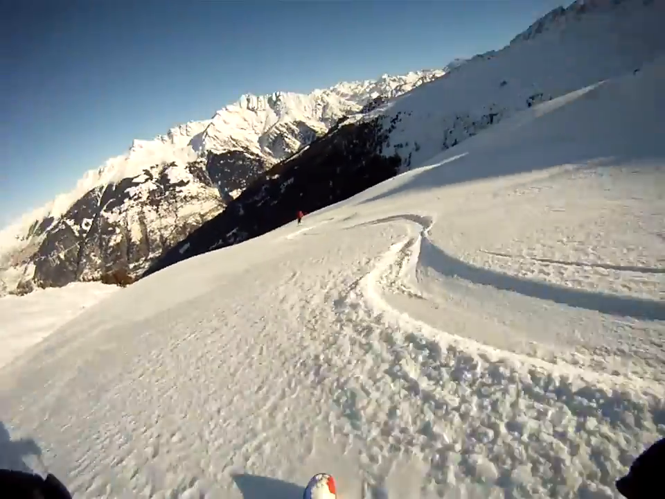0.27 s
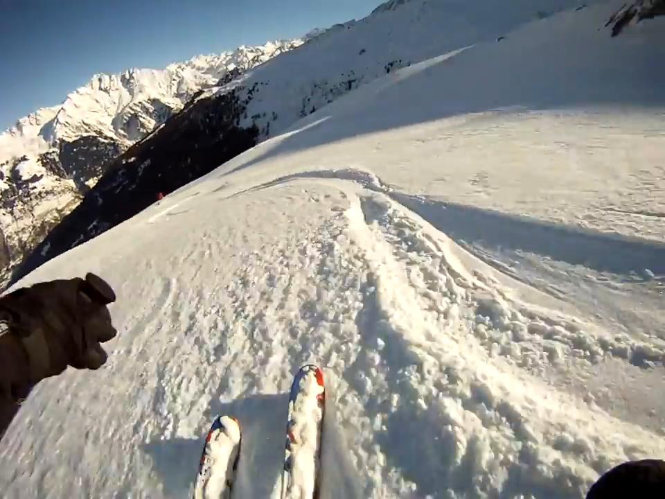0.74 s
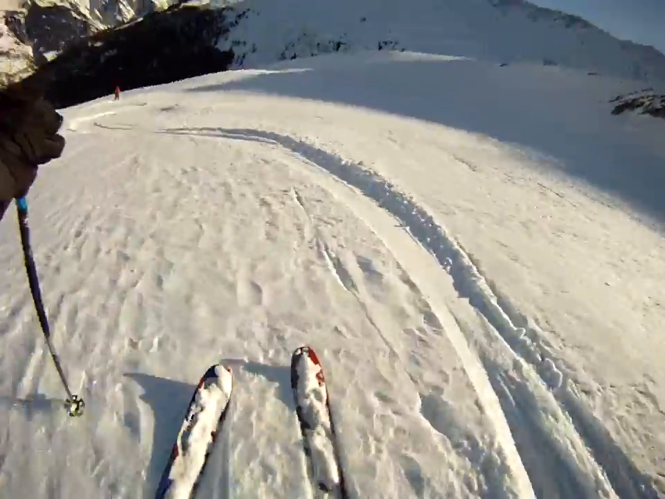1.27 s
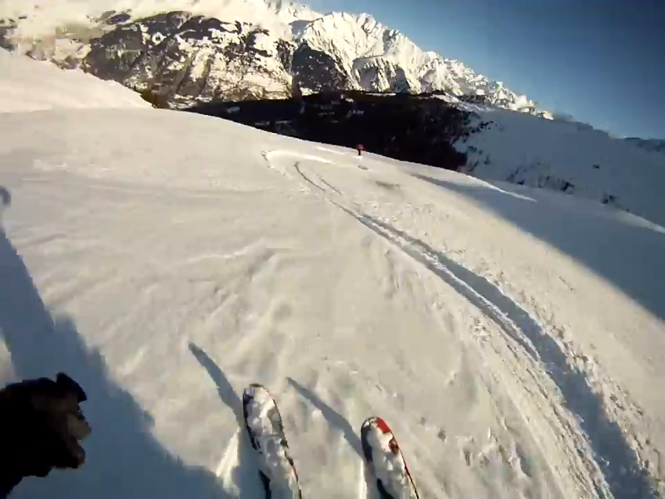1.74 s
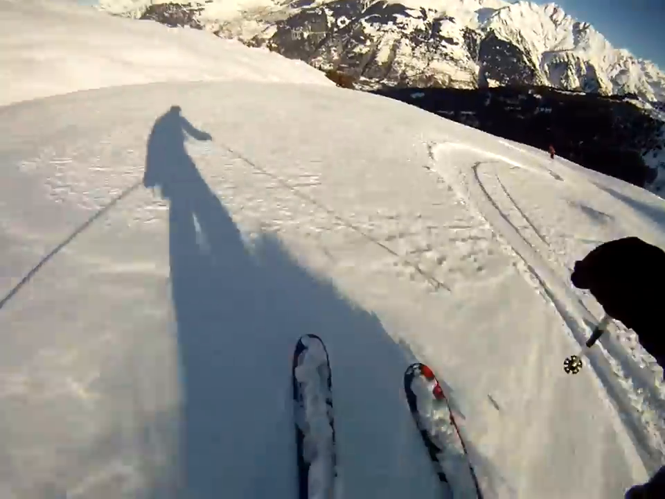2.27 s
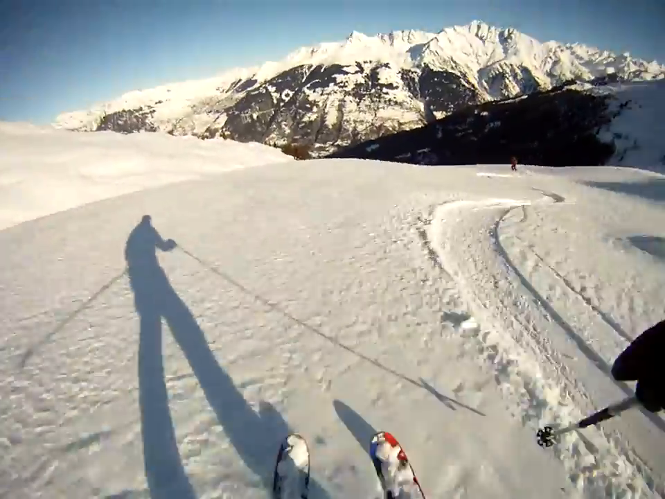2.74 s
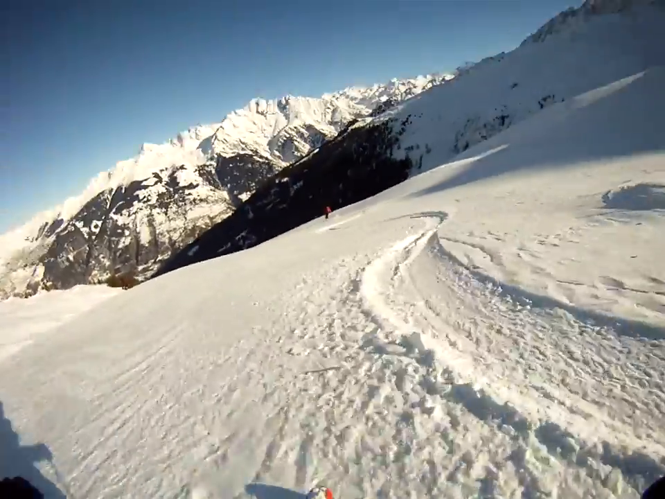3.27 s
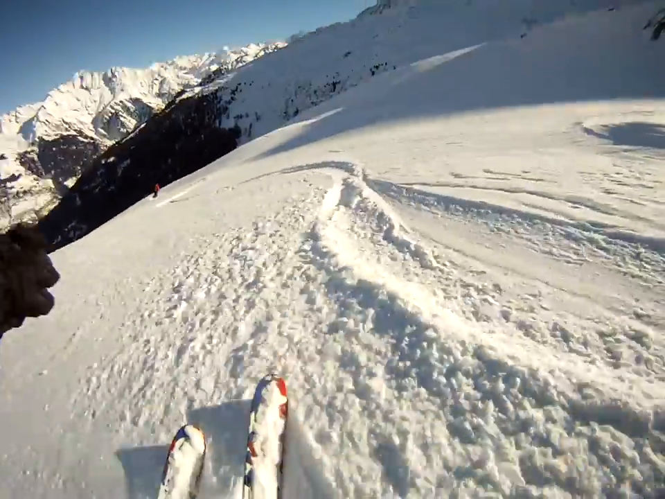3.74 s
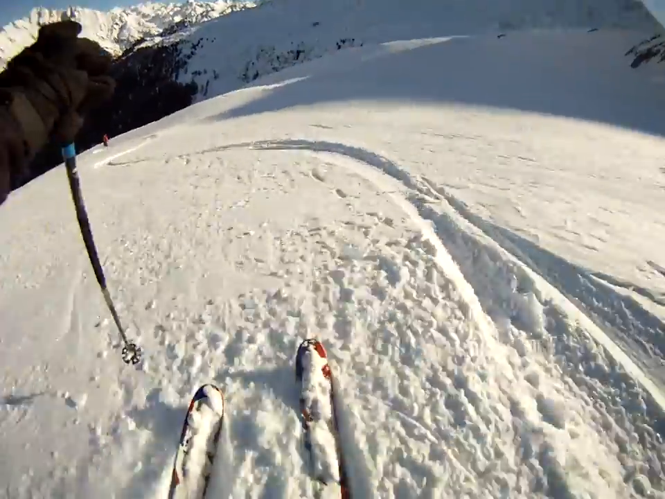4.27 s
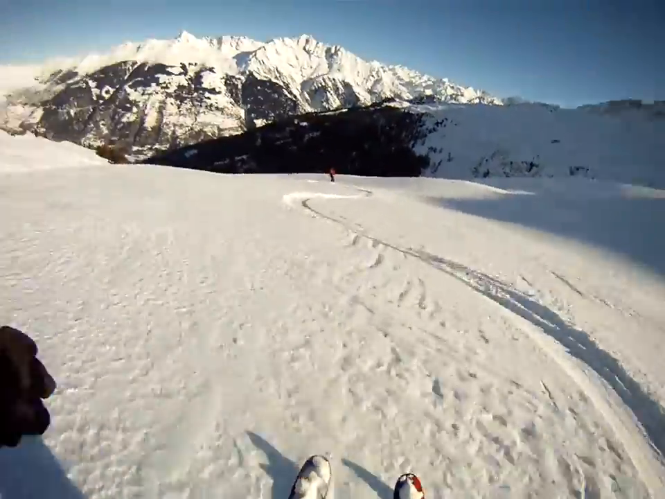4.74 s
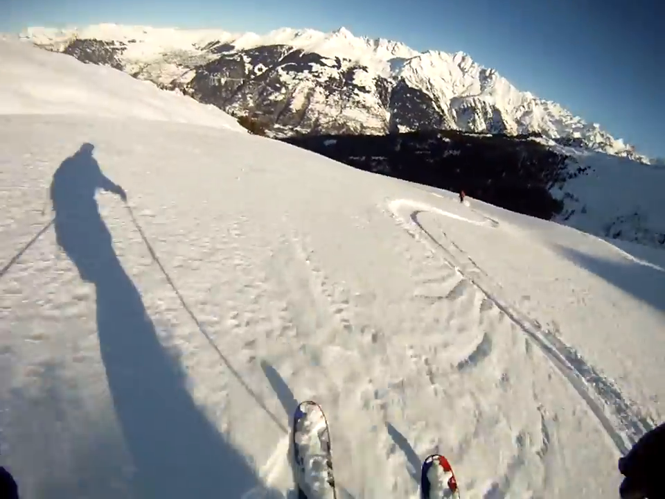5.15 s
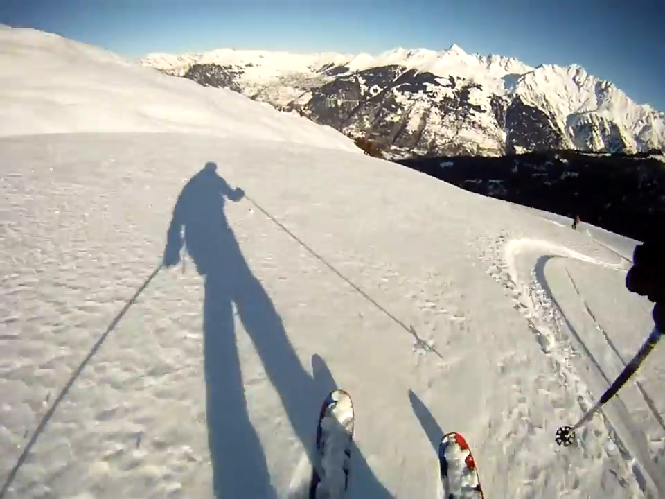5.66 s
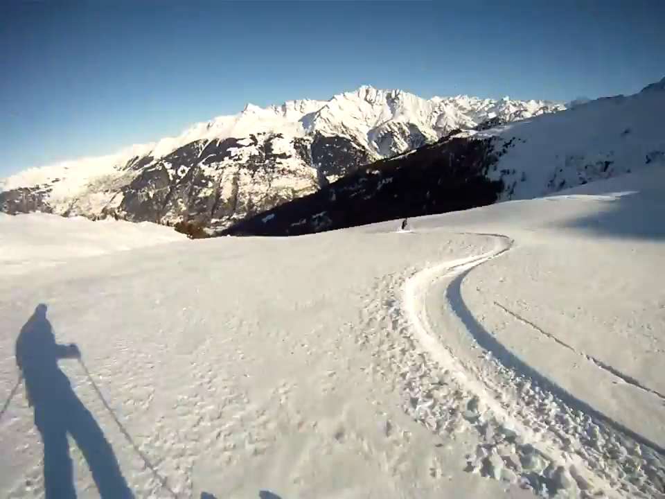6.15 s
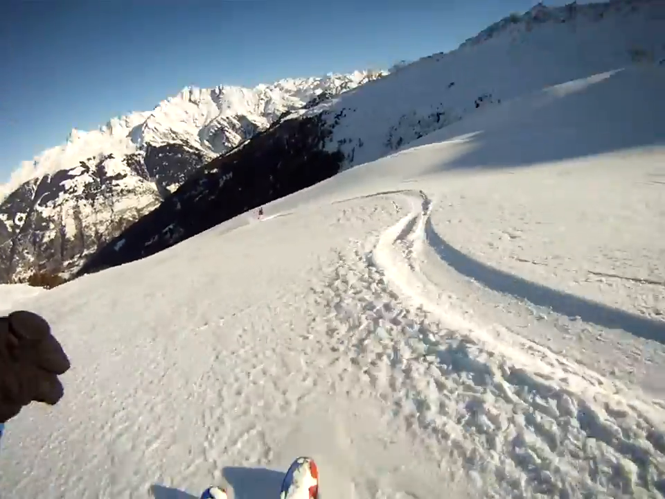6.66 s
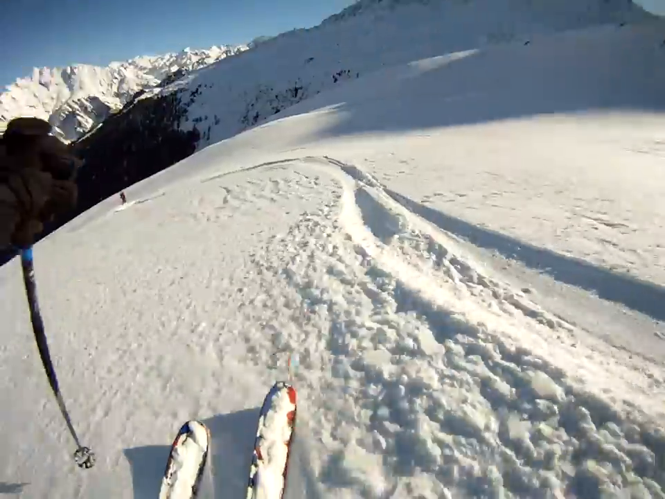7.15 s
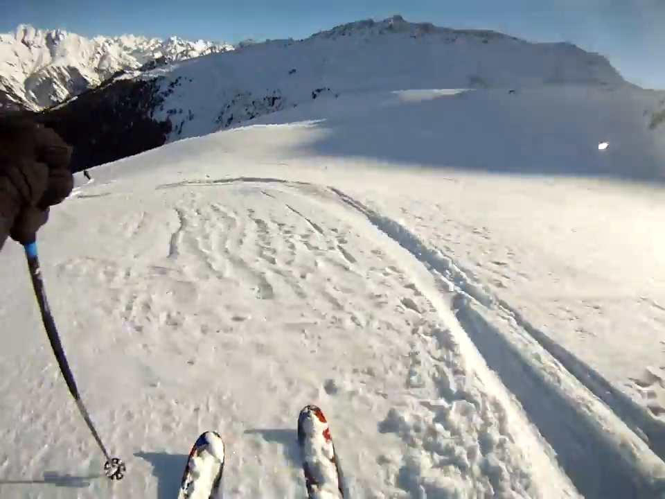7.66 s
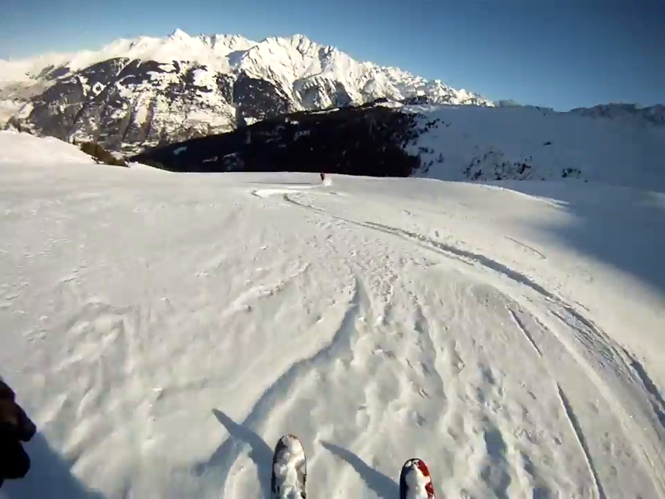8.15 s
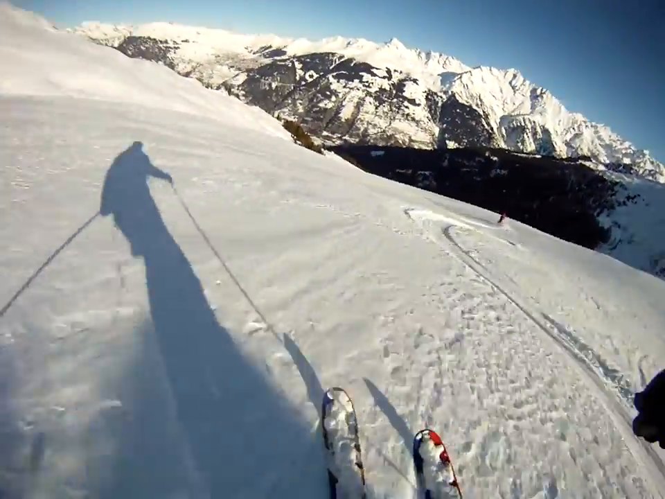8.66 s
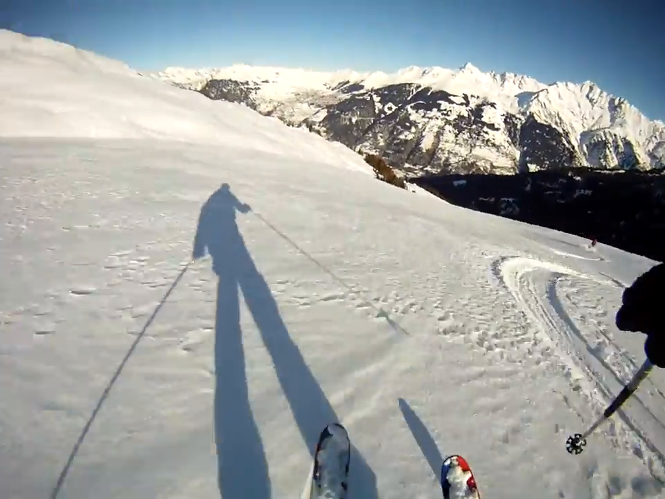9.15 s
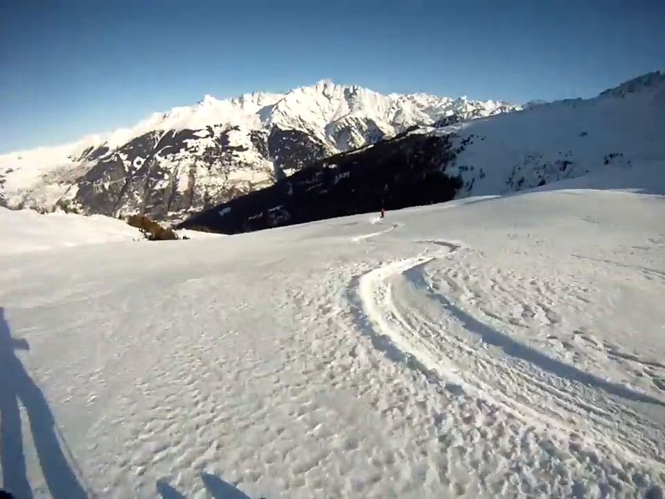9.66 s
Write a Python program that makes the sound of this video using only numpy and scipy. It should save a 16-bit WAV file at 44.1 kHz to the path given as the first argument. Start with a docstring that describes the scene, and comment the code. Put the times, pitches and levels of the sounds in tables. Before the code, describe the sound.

Gritty, boxy sound of a skier carving crusted snow: rhythmic edge swishes, dull thumps with hard rattles, loose-snow hiss, faint wind.

```python
"""A low airstream, flat skis scraping and a loose-snow hiss run throughout,
while edges swish through crusty snow from the start.
Scrape, crunch and rumble are random fractures; spray and gusty wind are shaped noise.
Ruts jolt a camera in a plastic case worn by the skier: each knock is a soft shove plus a hard rattle.
Every force rings through the case; coarse sample-and-hold adds a gritty sheen."""
import sys
import numpy as np
from scipy import signal
from scipy.fft import rfft, irfft
from scipy.io import wavfile
from scipy.ndimage import map_coordinates

SR = 44100
rng = np.random.default_rng(int(sys.argv[2]) if len(sys.argv) > 2 else 0)


def generate_wav(sig):
    """Save sig (samples, or channels by samples) to the path in sys.argv[1] as 16-bit PCM at SR."""
    pcm = np.round(np.clip(np.atleast_2d(sig).T, -1, 1) * 32767).astype(np.int16)
    wavfile.write(sys.argv[1], SR, pcm)


N = 436590


def amp(db):
    """Decibels to gain."""
    return 10 ** (np.asarray(db) / 20)


def unit(x):
    """Scale to rms 1."""
    return x / np.sqrt(np.mean(x ** 2) + 1e-20)


def curve(rows):
    """One value per sample from (t/s, value) rows."""
    return np.interp(np.arange(N) / SR, *np.transpose(rows))


def wobble(knots_hz):
    """Smooth random curve through normally distributed knots."""
    knots = rng.standard_normal(int(N * knots_hz / SR) + 4)
    return map_coordinates(knots, [np.arange(N) * knots_hz / SR])


def grains(rate_hz, spread_db):
    """Random tiny fractures of widely varying size, at rms 1."""
    size_db = spread_db * np.clip(rng.standard_normal(N), -2, 2)
    sizes = amp(size_db) * rng.choice([-1, 1], N)
    return unit(sizes * (rng.random(N) < rate_hz / SR))


def envelope(length_s, attack_s, release_s):
    """One second: linear rise from zero, multiplied by an exponential decay that starts at length_s."""
    t = np.arange(SR) / SR
    rise = np.minimum(t / attack_s, 1)
    return rise * np.exp(-np.maximum(t - length_s, 0) / release_s)


def add(track, start_s, sound):
    """Mix a sound into the track at start_s."""
    part = track[max(round(start_s * SR), 0):][:len(sound)]
    part += sound[:len(part)]


# resonances of the case and, lowest, its mount: f/Hz, full width at half lift/Hz, lift/dB
CASE_MODES = [(101.4, 29.7, 11), (164.5, 82, 5.5), (671, 124, 7), (822, 37, 7), (1010, 110, 5),
              (1170, 243, 11), (1925, 365, 18), (2207, 290, 6.5), (2620, 130, 3), (2933, 200, 5.5),
              (3582, 328, 16)]


def response(spectrum, size=4096):
    """Minimum-phase impulse response of a force spectrum lifted by the resonances of the case."""
    hz = np.fft.rfftfreq(size, 1 / SR)
    f, level_db = np.transpose(spectrum)
    db = np.interp(np.log(hz + 1), np.log(f), level_db)
    for centre_hz, width_hz, lift_db in CASE_MODES:
        db = db + lift_db / (1 + (2 * (hz - centre_hz) / width_hz) ** 2)
    # fold the cepstrum to make the response causal
    cepstrum = irfft(np.log(amp(db)))
    cepstrum[1:size // 2] *= 2
    cepstrum[size // 2 + 1:] = 0
    return irfft(np.exp(rfft(cepstrum)))


def through_case(force, spectrum):
    """A lasting force as it sounds inside the case, at rms 1."""
    return unit(signal.oaconvolve(force, response(spectrum))[:N])


# gusts on the case: t/s, buffet level/dB
GUSTS = [(0.52, -48.5), (1.47, -51), (2, -51), (2.24, -47), (4.95, -51), (5.44, -45), (5.92, -50),
         (6.43, -48.5), (8.37, -54.5), (8.85, -53)]
# wind force spectrum: f/Hz, relative level/dB
BUFFET_SPECTRUM = [(8, -6), (25, 2.5), (45, -3.5), (70, -9), (150, -30.5), (500, -43.5)]
AIRSTREAM_DB = -56.5
GUST_S = 0.042  # half width at 1/e power


def wind(eddy_db=2.5):
    """Eddies push on the case in slow lumps; short gusts stand out of the steady airstream."""
    t = np.arange(N) / SR
    power = amp(AIRSTREAM_DB) ** 2
    for gust_s, level_db in GUSTS:
        power = power + amp(level_db) ** 2 * np.exp(-((t - gust_s) / GUST_S) ** 2)
    eddies = rng.standard_normal(N) * amp(eddy_db * wobble(17))
    return through_case(eddies, BUFFET_SPECTRUM) * np.sqrt(power)


# loose snow thrown up: t/s, hiss level/dB
SPRAY = [(0.0, -59.5), (0.2, -61), (1.25, -65), (1.55, -58.0), (2.05, -57.0), (2.6, -63.5), (3.25, -58.5),
         (4.3, -64.0), (4.6, -60), (5.8, -62.0), (6.25, -64.0), (6.65, -59.5), (6.9, -63.0), (7.6, -64.0),
         (7.95, -64), (8.82, -60), (9.1, -65.5), (9.9, -61)]
# hiss force spectrum: f/Hz, relative level/dB
HISS_SPECTRUM = [(800, -18), (2500, -6.5), (4000, -6.5), (5000, 0.5), (5600, -5.5), (6000, -9.5)]


def spray():
    """Fine loose snow makes a smooth hiss, its level wavering slightly."""
    level_db = curve(SPRAY) + 0.57 * wobble(10.0)
    return through_case(rng.standard_normal(N), HISS_SPECTRUM) * amp(level_db)


KNOCK_S = 0.02  # reference duration of knock levels


def ring(force, body):
    """A short force as it rings in the case, with the energy of rms 1 lasting KNOCK_S."""
    sound = signal.fftconvolve(force, body)[:len(force)]
    return sound * np.sqrt(KNOCK_S * SR / np.sum(sound ** 2))


# ruts and lumps, levels over KNOCK_S: t/s, thump level/dB, shove length/ms, clack level/dB, tick level/dB
JOLTS = [(0.117, -54, 2.3, -52, -49.5), (0.298, -36.5, 0.9, -57.0, -51.5),
         (0.615, -30.0, 2.7, -41.5, -47.5), (0.685, -36.5, 0.66, -43.5, -47), (0.829, -44, 0.72, -47, -70),
         (1.011, -36.5, 0.44, -36.5, -50.5), (1.161, -34, 0.94, -41.5, -48.5),
         (1.255, -35.0, 2.4, -51, -52.5), (1.326, -42, 1.8, -48.0, -63), (1.425, -35, 1.7, -36.5, -47.5),
         (1.56, -40.5, 0.67, -56, -44), (1.674, -41.0, 0.62, -41.5, -42), (1.761, -41, 1.4, -57.5, -62),
         (1.945, -32.5, 2.5, -40.0, -44.5), (2.036, -32.0, 2.1, -41.5, -46.5),
         (2.174, -31.5, 1.2, -40.5, -43), (2.262, -33, 1.2, -42, -44.5), (2.458, -35, 0.97, -54.5, -55),
         (2.682, -32, 1.5, -44.5, -41.5), (3.291, -48, 1.3, -48.0, -50.5), (3.902, -27.5, 1.9, -39.5, -42),
         (4.103, -34, 1.3, -39.5, -47), (4.628, -26.5, 2.5, -43.5, -40.5), (5.233, -55, 0.7, -50, -54.5),
         (5.303, -42.5, 0.53, -49.5, -58), (5.888, -39.0, 0.51, -48, -48.5),
         (5.959, -43.0, 0.75, -48.5, -50.5), (6.345, -56, 1.1, -56.5, -65), (6.397, -51, 1.1, -50, -48),
         (6.498, -45.5, 0.52, -59, -67), (6.8, -50.5, 1.9, -49, -49), (6.883, -41, 0.74, -58, -64),
         (6.903, -37.0, 2, -52.5, -52.0), (6.988, -42, 1.4, -58, -51), (7.154, -38, 0.53, -52.5, -54.5),
         (7.324, -39.0, 3.9, -50, -61), (7.375, -38, 4.4, -49.5, -58), (7.432, -42.0, 3.2, -50, -67),
         (7.868, -28.0, 2.7, -41, -41.5), (8.244, -51, 1.7, -65, -49), (8.688, -49.5, 2.4, -58.5, -57.5),
         (8.886, -50.5, 2.1, -56.5, -59.0), (9.317, -41, 1.3, -50.5, -47), (9.827, -44, 2, -62, -70)]
# knock force spectra: f/Hz, relative level/dB
THUMP_SPECTRUM = [(20, -27), (55, -8), (85, -7.5), (130, -7.5), (235, -1), (300, -7.5), (370, -22.5),
                  (900, -43)]
CLACK_SPECTRUM = [(150, -8.5), (400, -8), (600, 1), (900, 0), (1350, 0.5), (1700, -15.5), (3000, -31),
                  (6000, -58)]
TICK_SPECTRUM = [(600, -18.5), (1400, -15), (1900, -1.5), (2250, 4.5), (2750, -5.5), (3500, -1),
                 (4200, -14), (6000, -16.5)]


def knocks(rattle_s=0.006, settle_s=0.022, settle_db=-13, lag_s=0.001722, rebound=0.22, hard_share=0.07):
    """Each jolt rocks the camera on its mount while the case chatters against it for a few milliseconds."""
    out = np.zeros(N)
    t = np.arange(SR // 6) / SR
    thump_body = response(THUMP_SPECTRUM)
    clack_body = response(CLACK_SPECTRUM)
    tick_body = response(TICK_SPECTRUM)
    rattle_decay = np.exp(-(t / rattle_s) ** 2) + amp(settle_db) * np.exp(-t / settle_s)
    for jolt_s, thump_db, push_ms, clack_db, tick_db in JOLTS:
        # a longer, softer shove excites only lower modes
        push = t * np.exp(-(t / (push_ms / 1000)) ** 2)
        rebound_s = rng.uniform(0.0029, 0.00864)
        shove = push + rebound * rng.normal() * np.roll(push, round(rebound_s * SR))
        # a few hard contacts among many light ones
        hardness = 0.089 + (rng.random(len(t)) < hard_share)
        rattle = rng.standard_normal(len(t)) * hardness * rattle_decay
        thump = ring(shove, thump_body) * rng.choice([-1, 1]) * amp(thump_db)
        clack = ring(rattle, clack_body) * amp(clack_db)
        tick = ring(rattle, tick_body) * amp(tick_db)
        add(out, jolt_s + lag_s, thump + clack + tick)
    return out


CRUNCH_DB, RUMBLE_DB = -6.5, -5.5  # relative to scrape, before crust
RUMBLE_GROWS = 2.13  # rumble dB per dB of crust


def contact_powers(scrape_db, crust_db):
    """Powers of scrape, crunch and rumble; breaking crust adds bass."""
    crunch_db = scrape_db + CRUNCH_DB + crust_db
    rumble_db = scrape_db + RUMBLE_DB + RUMBLE_GROWS * crust_db
    return [amp(db) ** 2 for db in (scrape_db, crunch_db, rumble_db)]


# friction of flat skis: t/s, scrape level/dB
GLIDE = [(0.0, -58.5), (0.45, -60), (0.9, -54.5), (1.7, -58.5), (2.33, -56), (2.5, -61), (3.4, -61),
         (4.35, -58.5), (4.95, -58.5), (5.62, -61.0), (6.15, -57.0), (6.32, -63), (7.25, -60.5),
         (7.58, -61), (8.65, -62.0), (8.95, -60), (9.15, -64.0), (9.9, -57.5)]
# swishes of biting edges: t/s, length/s, scrape level/dB, relative crust level/dB
SWISHES = [(0.1, 0.26, -52, -3), (0.545, 0.23, -48, 1.5), (0.966, 0.19, -52.5, 1.5),
           (1.248, 0.21, -47.5, 3), (1.47, 0.13, -44.0, -2.5), (1.756, 0.038, -43, -15),
           (1.867, 0.16, -52, 5), (2.06, 0.15, -52, -4), (2.55, 0.17, -50.5, -6), (2.722, 0.2, -49.5, 3.5),
           (2.946, 0.29, -49.5, -4), (3.266, 0.055, -44.5, 3), (3.412, 0.28, -49.5, -7.5),
           (3.726, 0.34, -52, -2), (4.057, 0.18, -53, 4), (4.4, 0.44, -49.5, -1), (4.99, 0.13, -49, -5),
           (5.248, 0.28, -55.0, 2), (5.693, 0.3, -53.5, -5), (5.961, 0.1, -47.5, 3.5),
           (6.318, 0.15, -54, 4), (6.5, 0.082, -51.5, 1.5), (6.62, 0.16, -53.5, 0.5),
           (6.854, 0.16, -55.0, 3), (7.108, 0.038, -48, 3), (7.25, 0.27, -56, 1), (7.632, 0.43, -51, -0.5),
           (7.92, 0.065, -47, 1.0), (8.147, 0.14, -56, 4.5), (8.36, 0.25, -58, -1),
           (8.717, 0.076, -49.5, -11), (9.266, 0.21, -56, 4), (9.48, 0.12, -49, -2.5)]
GLIDE_CRUST_DB = 4
BITE_S, RELEASE_S = 0.075, 0.033  # edge digs in, lets go
SHAKE_DB, SHAKE_S = -19.5, 0.14  # skier's shake after a jolt: gain on thump level, decay


def snow_contact():
    """Amplitudes of scrape, crunch and rumble: powers of glide, swishes and the skier's shaking add."""
    scrape, crunch, rumble = contact_powers(curve(GLIDE), GLIDE_CRUST_DB)
    for swish_s, length_s, scrape_db, crust_db in SWISHES:
        bite_power = envelope(length_s, BITE_S, RELEASE_S) ** 2
        for track, power in zip((scrape, crunch, rumble), contact_powers(scrape_db, crust_db)):
            add(track, swish_s, power * bite_power)
    shake = envelope(0, KNOCK_S, SHAKE_S)
    for jolt_s, thump_db, *_ in JOLTS:
        add(rumble, jolt_s, (amp(thump_db + SHAKE_DB) * shake) ** 2)
    return np.sqrt([scrape, crunch, rumble])


# snow force spectra: f/Hz, relative level/dB
SCRAPE_SPECTRUM = [(500, -38), (1200, -8.5), (1600, -3), (2500, -3), (3300, -3.5), (4000, -11), (5200, -15),
                   (6000, -21.5)]
CRUNCH_SPECTRUM = [(200, -21.5), (400, 5), (700, 1), (1300, 3.5), (1700, -1), (2600, -24), (5000, -41)]
RUMBLE_SPECTRUM = [(30, -22), (90, -8), (140, -3), (200, -6), (290, -5), (400, -19), (900, -41.5)]
CRACKS_HZ, CRACK_DB = 16, -7  # mean rate of plate snaps; level against crunch


def skis(uneven_db=1.1, lumpy_db=1.16, bumpy_db=1.9, chatter_db=1.0, flutter_db=1.5, snap_s=0.0035):
    """Edges break crust in fast uneven bites; small plates snap; the chatter shakes the skier too."""
    scrape_level, crunch_level, rumble_level = snow_contact()
    chatter = chatter_db * unit(wobble(35) + 0.5 * wobble(110))

    crystals = grains(rate_hz=3500, spread_db=4.5)
    scrape_swing_db = chatter + flutter_db * wobble(60) + uneven_db * wobble(14)
    scrape = through_case(crystals * amp(scrape_swing_db), SCRAPE_SPECTRUM)

    crust = grains(rate_hz=1200, spread_db=2.2)
    crunch = through_case(crust * amp(chatter + lumpy_db * wobble(18)), CRUNCH_SPECTRUM)

    lumps = grains(rate_hz=190, spread_db=2.0)
    rumble = through_case(lumps * amp(chatter + bumpy_db * wobble(14)), RUMBLE_SPECTRUM)

    snap_decay = np.exp(-np.arange(SR // 20) / SR / snap_s)
    snaps = signal.oaconvolve(grains(rate_hz=CRACKS_HZ, spread_db=2.5), snap_decay)[:N]
    cracks = through_case(snaps * rng.standard_normal(N), CLACK_SPECTRUM) * amp(CRACK_DB)
    return scrape * scrape_level + (crunch + cracks) * crunch_level + rumble * rumble_level


def scene():
    """All sources meet at the one microphone."""
    return (wind() + spray() + knocks() + skis())[None]


HOLD_HZ, TOP_HZ = 12000, 15400  # coarse sample rate; output cutoff


def record(dry):
    """Coarse sampling with held values mirrors the sound around multiples of the hold rate."""
    coarse = signal.resample_poly(dry, HOLD_HZ, SR, axis=1, window=("kaiser", 5))
    steps = np.repeat(coarse, 4, axis=1)
    held = signal.resample_poly(steps, SR, 4 * HOLD_HZ, axis=1)[:, :N]
    passband = np.fft.rfftfreq(N, 1 / SR) < TOP_HZ
    return irfft(rfft(held) * passband, N)


dry = scene()
out = record(dry)
generate_wav(out)
```